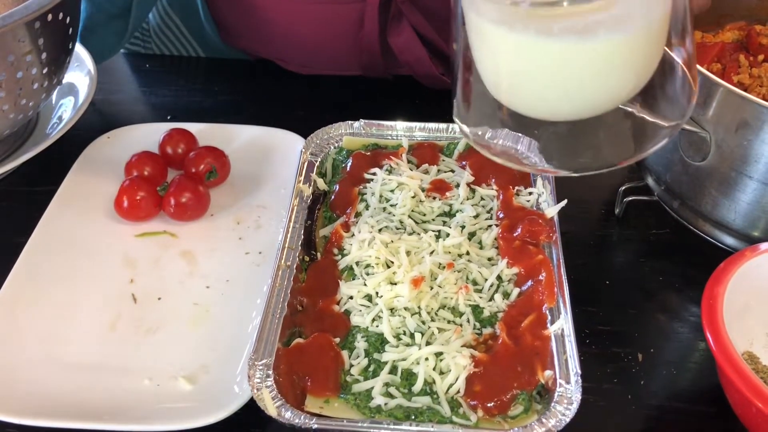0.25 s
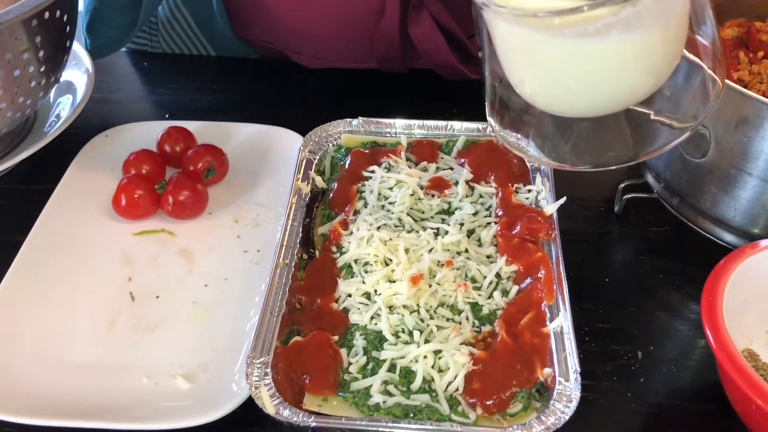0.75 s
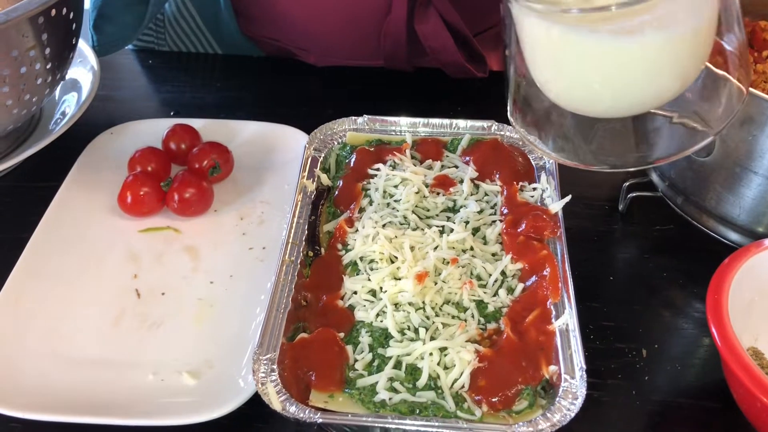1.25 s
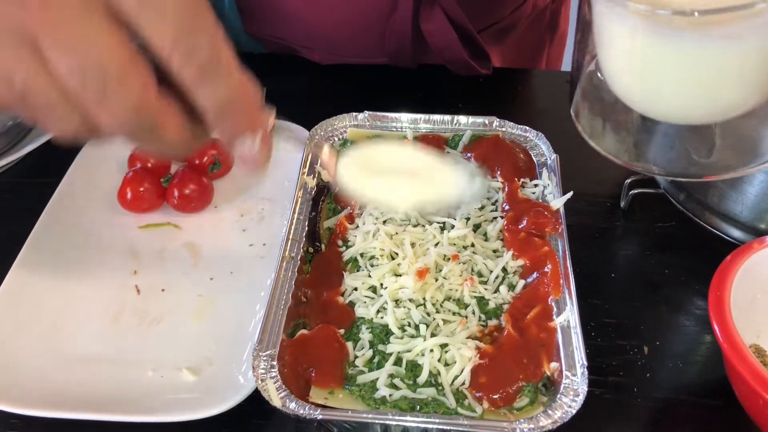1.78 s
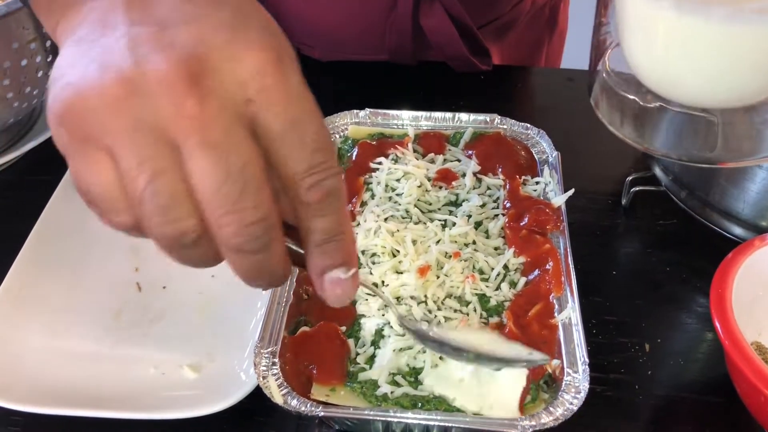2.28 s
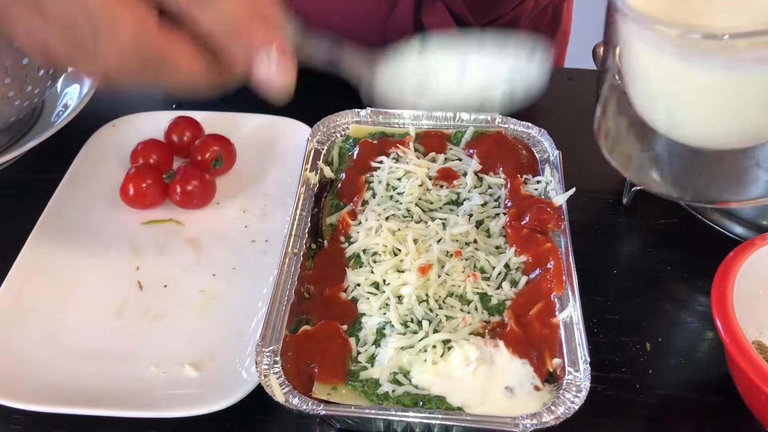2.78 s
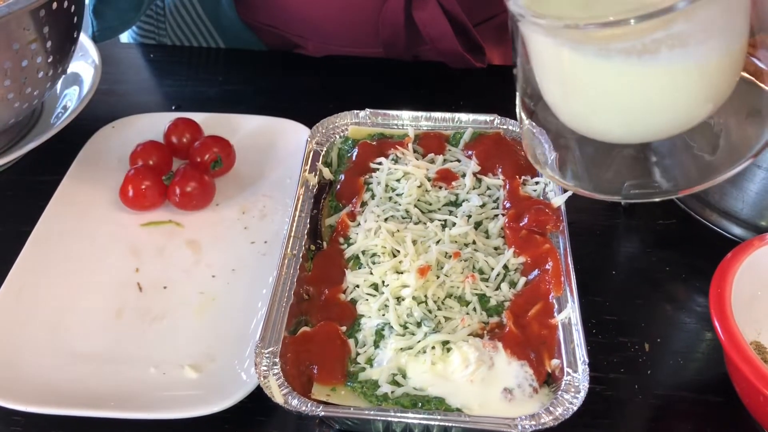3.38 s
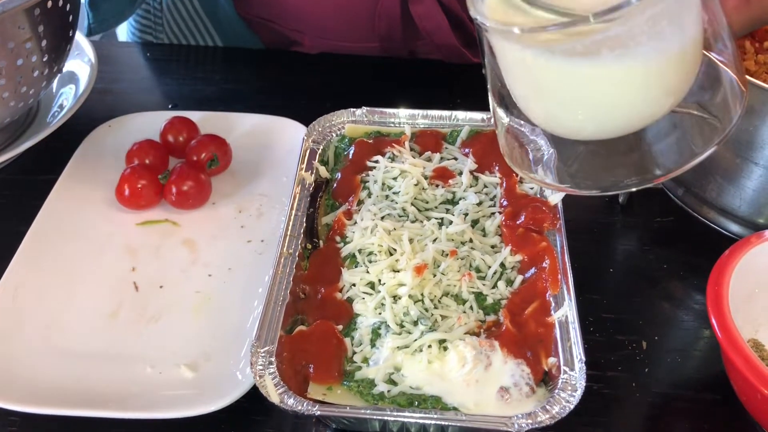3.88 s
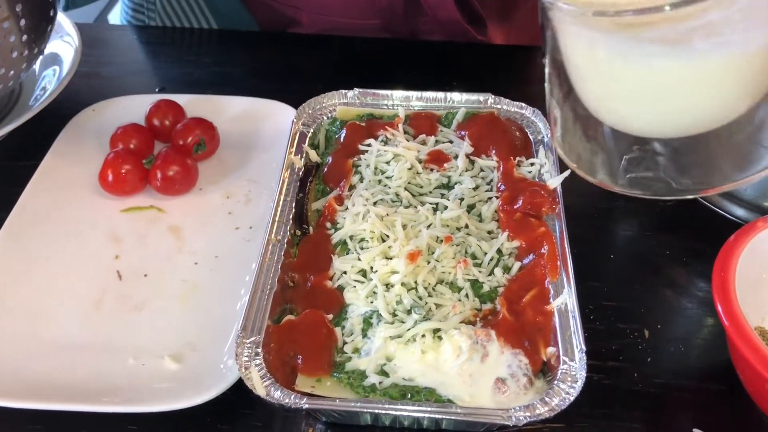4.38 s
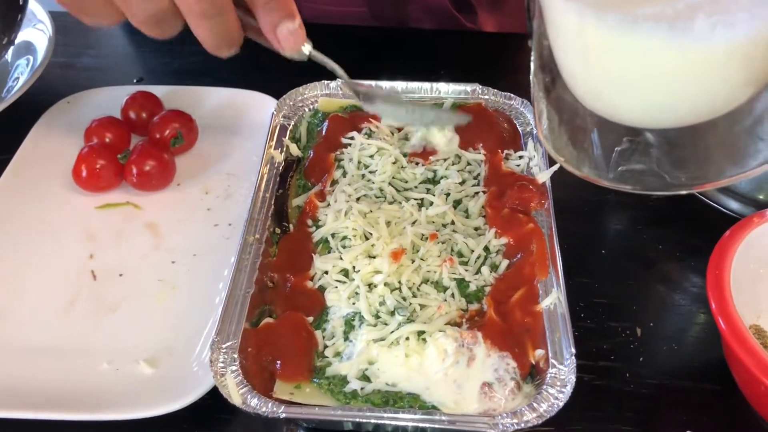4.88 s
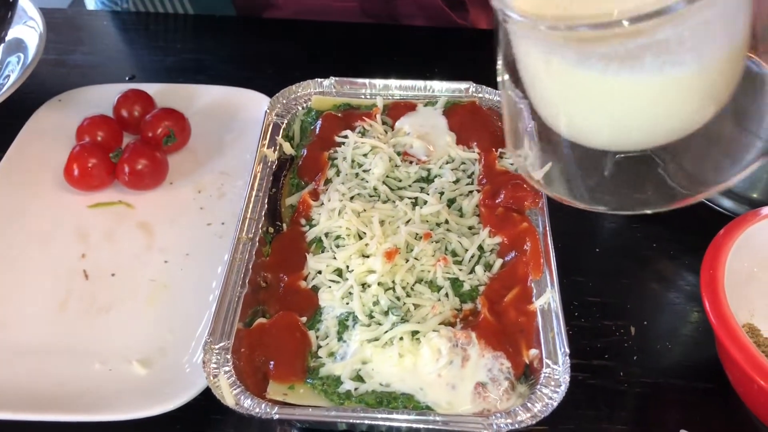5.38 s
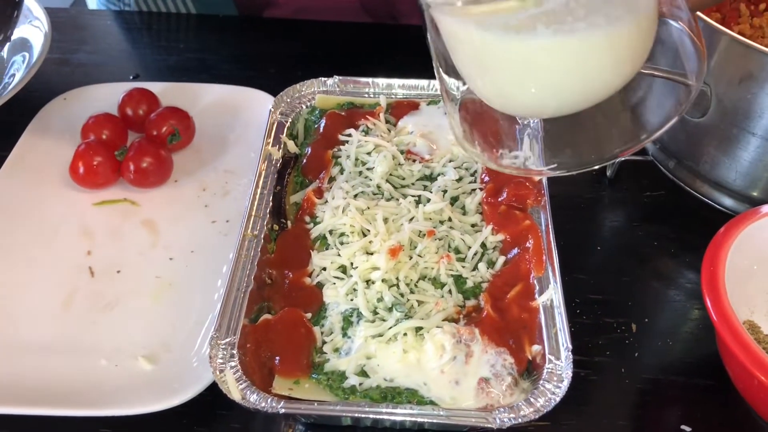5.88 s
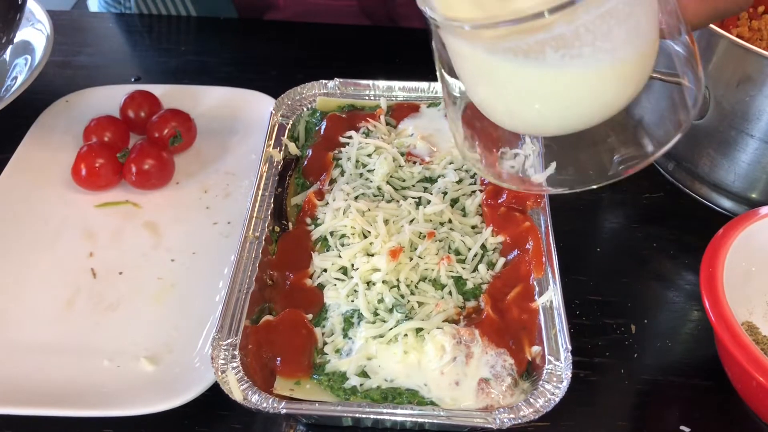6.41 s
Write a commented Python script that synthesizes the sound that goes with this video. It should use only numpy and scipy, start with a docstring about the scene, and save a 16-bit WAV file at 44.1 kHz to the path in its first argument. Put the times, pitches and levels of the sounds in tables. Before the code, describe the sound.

A close double clink of a metal spoon on a glass bowl opens over a low, steady kitchen hum. After faint rustles of spooned sauce and a tiny gliding squeal, the spoon rattles against the glass in a fast run of sharp, ringing knocks, the loudest moment. Another clink, small ticks and more soft spooning lead to one final knock, each strike leaving a short room echo.

```python
"""A steel spoon knocks inside a glass bowl of white sauce, close to the microphone in a quiet kitchen.
Each knock cracks, clanks and sets the glass ringing, and the counter and the room answer it.
Harder knocks are brighter, and the loudest overload the recorder. Between them come small ticks,
soft spooning of sauce onto a foil tray and a faint thin squeal, over a low room hum."""
import sys
import numpy as np
from scipy import signal
from scipy.fft import rfft, irfft, next_fast_len
from scipy.io import wavfile
from scipy.ndimage import map_coordinates

SR = 44100
rng = np.random.default_rng(int(sys.argv[2]) if len(sys.argv) > 2 else 0)


def digitize_waveform(pressure):
    """Quantize a signal to 16-bit integers and store it at the path in sys.argv[1].

    Rows of a 2-D input are taken as channels; values are limited to [-1, 1].
    """
    field = np.atleast_2d(pressure).T
    bounded = np.clip(field, -1, 1)
    quanta = np.round(bounded * 32767).astype(np.int16)
    wavfile.write(sys.argv[1], SR, quanta)


N = 293265

# Knocks of steel on glass. Each row: start in seconds, force in dB, extra weight of the low clank in dB,
# ring level in dB, spot on the bowl, part of the spoon.
KNOCKS = [(0.8986, -18.5, 5, -26, "rim", "back"), (0.9625, -14, 3.5, -19.5, "rim", "back"),
          (3.7016, -11, 2, -12.5, "wall", "back"), (3.7352, -31, 11.5, -24.5, "wall", "back"),
          (3.7988, -13, 0.5, -16, "wall", "back"), (3.838, -17.5, 8.5, -30, "shoulder", "neck"),
          (3.9338, -17, -0.5, -21, "wall", "back"), (3.9679, -21, 2.5, -21, "wall", "edge"),
          (4.022, -42.5, 10, -50, "wall", "back"), (4.41, -19.5, -12, -29.5, "base", "edge"),
          (6.0856, -17, 5, -23.5, "base", "tip")]


def spoon_knocks():
    """Steel strikes glass close by: a sharp crack and a short clank, coloured by force and spoon part."""
    # Short-lived modes of spoon and glass. Each row: pitch in Hz, relative level in dB, t60 in seconds.
    clank_modes = [(1335, -5, .05), (1455, -9, .06), (1507, 3, .08), (1560, -9, .05), (2975, 2, .075),
                   (3130, -10, .035), (3270, -11, .035), (3505, -7, .04), (3564, 0, .05), (3645, -5, .045),
                   (3790, -9, .045), (4020, -16, .07), (4184, -12, .06), (4508, -3, .08), (4600, -10, .12),
                   (5350, -6, .06), (5500, -14, .17), (5768, -6, .07), (6000, -9, .06), (6238, -3, .05),
                   (6670, -3, .05), (7090, -9, .06), (7223, -9, .08), (7550, -14, .08), (8950, -15, .11),
                   (9120, -13, .1), (9480, -12, .08), (9850, -8, .04), (10330, -10, .04), (11190, -9, .04),
                   (11850, -9, .04), (12250, -11, .04)]
    # Spectrum of the contact itself. Each row: frequency in Hz, relative level in dB.
    crack_colour = [(100, -17), (400, -11.5), (700, -19), (950, -7), (1700, 3.5), (2300, -1.5), (3200, 4),
                    (4300, 2.5), (5000, 0), (6000, -2.5), (7400, -4.5), (8350, -7), (9600, 1.5),
                    (12500, -4.5), (16000, -5.5)]
    # Each part of the spoon: gain in dB near 3 kHz, near 3.6 kHz, at 4-6 kHz, in the top treble.
    part_colour = {"back": (8.5, 11.5, -2, -0.5), "neck": (4.4, 3.5, 1.1, 2.5),
                   "edge": (-12.5, 1.5, -1, -4.5), "tip": (-0.5, -11, 3.5, -4)}
    firm_db, brightening = -16.5, 0.17  # harder is a shorter contact: dB of treble per dB above firm
    out, t = np.zeros(N), np.arange(SR) / SR
    hz, mode_db, t60 = np.transpose(clank_modes)
    mode_band = np.searchsorted([2000, 3300, 4100, 6100, 8400], hz)
    attack = 1 - np.exp(-t / 0.00035)
    chatter = amp(-60 * t / 0.017) + amp(-9.5) * amp(-60 * t / 0.036)  # the blow, then steel buzzing
    for start, force_db, weight_db, _, _, part in KNOCKS:
        *middle_db, upper_db, top_db = part_colour[part]
        treble_db = top_db + brightening * (force_db - firm_db)
        band_db = force_db + np.array([weight_db, *middle_db, upper_db, 0, treble_db])
        grip = 1 + .003 * rng.standard_normal(len(hz))  # the grip on the spoon shifts the modes a little
        clank = modes(hz * grip, amp(mode_db + band_db[mode_band]), t60, t)
        add(out, start, in_kitchen(clank * attack, wet_db=-20, counter_db=-25, build_s=0.016))
        hardness = [(1500, weight_db), (5500, upper_db), (11000, treble_db)]
        burst = noise(lambda f: amp(along(crack_colour, f) + along(hardness, f)), size=len(t))
        crack = amp(force_db + 10) * burst * chatter * attack
        add(out, start, in_kitchen(crack, wet_db=-14, counter_db=-18.5, build_s=0.0032))
    return out


def bowl_ring():
    """The glass sings on after each knock until the next firm touch damps it."""
    # The bowl's long-ringing bending modes. Each row: pitch in Hz, t60 in seconds.
    bending_modes = [(1288, .52), (2735, .4), (2992, .41), (3645, .36)]
    # Each spot struck: level of the second, third and fourth mode against the lowest, in dB.
    spot_colour = {"rim": (-32.5, -1.1, -33), "wall": (-11.5, -25.5, -12), "shoulder": (8.6, -16, -8),
                   "base": (-6, -28, -28)}
    # Times in seconds when the spoon or the sauce settles on the wall and stops the ring.
    settle_times = [1.29, 4.17, 4.75, 6.37]
    light_db = -39  # a knock with less force lets the glass ring on
    out, t = np.zeros(N), np.arange(SR) / SR
    hz, t60 = np.transpose(bending_modes)
    firm_times = [start for start, force_db, *_ in KNOCKS if force_db > light_db]
    touches = np.array(firm_times + settle_times + [np.inf])
    attack = 1 - np.exp(-t / 0.0012)
    for start, _, _, ring_db, spot, _ in KNOCKS:
        free_s = touches[touches > start].min() - start
        damping = amp(-60 * np.maximum(t - free_s, 0) / 0.056)
        gains = amp(ring_db + np.array([0, *spot_colour[spot]]))
        add(out, start, modes(hz, gains, t60, t) * damping * attack)
    sway = amp(1.3 * wobble(35))  # the bowl turns in the hand, so its ring swells and sinks
    return in_kitchen(out * sway, wet_db=-18, counter_db=-26, build_s=.02)


def ticks():
    """Light touches of spoon and foil: a few milliseconds of noise around one pitch, with no ring."""
    # Each row: start in seconds, level in dB, centre pitch in Hz.
    touches = [(1.7313, -57, 12650), (3.486, -53, 6800), (4.647, -39.5, 10300), (4.712, -47.5, 12420),
               (4.7214, -48, 4930), (4.809, -50.5, 10800)]
    out, t = np.zeros(N), np.arange(SR // 3) / SR
    for start, db, hz in touches:
        burst = noise(lambda f: 1 / np.hypot(1, 1.8 * (f / hz - hz / (f + 1))), size=len(t))
        tick = amp(db) * burst * amp(-60 * t / .03)
        add(out, start, in_kitchen(tick, wet_db=-13.5, counter_db=-15.5, build_s=.01))
    return out


def hiss_and_sauce():
    """A soft hiss dies away at the start; later come soft, uneven rustles as sauce is spooned."""
    # Each row: peak time in seconds, level in dB, seconds to fade by 20 dB.
    # A negative fade reverses the shape: a slow swell and a quick stop.
    peaks = [(0.06, -57.5, 1.5), (2.56, -61, -0.1), (3.04, -57, 0.9), (3.29, -68.5, -0.05),
             (5.08, -67, 1.3), (5.33, -66, 0.75)]
    # Spectrum of hiss and rustles. Each row: frequency in Hz, relative level in dB.
    colour = [(300, -11.5), (1200, 4), (2500, -1), (5000, -0.5), (6300, -0.5), (7200, 0.5), (8600, -8),
              (10000, 1), (11000, -6), (13000, -5), (15500, -4)]
    swells = [amp(db) * swell(peak_s, 0.37 * fade_s, fade_s) for peak_s, db, fade_s in peaks]
    level = np.hypot(amp(-79), np.linalg.norm(swells, axis=0))  # a faint floor stays between swells
    return level * amp(1.4 * wobble(130)) * noise(lambda f: amp(along(colour, f)), size=N)


def squeal():
    """One faint thin tone dips and climbs; it turns weaker and rougher while it glides fast."""
    # Each row: time in seconds, pitch in Hz.
    pitch_path = [(3.108, 2030), (3.124, 1695), (3.164, 1556), (3.3, 1537), (3.352, 1655), (3.386, 2057),
                  (3.476, 2341), (3.58, 2339)]
    attack_s, release_s = 0.0205, .04
    fast_hz_per_s = 14000  # gliding this fast costs the tone 3 dB
    t = np.arange(N) / SR
    times, pitches = np.transpose(pitch_path)
    hz = np.interp(t, times, pitches)
    start, end = times[0], times[-1]
    sounding = np.interp(t, [start - attack_s, start, end - release_s, end + release_s], [0, 1, 1, 0])
    glide = np.abs(np.gradient(hz)) * SR / fast_hz_per_s
    jitter = .004 * wobble(80) + .012 * np.tanh(glide) * wobble(300)
    tone = np.sin(2 * np.pi * np.cumsum(hz * (1 + jitter)) / SR) / np.hypot(1, glide)
    level = sounding * amp(-59.5 + 1.2 * wobble(61))
    return in_kitchen(level * tone, wet_db=-5.5, counter_db=0, build_s=.008)


def room_tone():
    """Low steady kitchen noise, a little louder at first, with a few humming bands that waver."""
    # Spectrum of the room's air. Each row: frequency in Hz, relative level in dB.
    air_colour = [(12, -71), (20, -35), (48, -9.5), (93, -5.5), (123, -6), (167, 0.5), (203, -6.5),
                  (233, -4), (268, -6.5), (693, -12), (916, -13.5), (1280, -18), (2120, -22.5),
                  (2650, -24.5), (15800, -33)]
    # Each row: centre in Hz, width in Hz, level in dB.
    hum_bands = [(101, 7.4, -67.5), (173, 12, -69.5), (303, 6.6, -68.5), (880, 130, -63.5)]
    air_db = -54 + 6 * np.exp(-np.arange(N) / SR / 0.12)
    air = amp(air_db + 0.34 * wobble(4.6)) * noise(lambda f: amp(along(air_colour, f)), size=N)
    hum = np.zeros(N)
    for hz, width, db in hum_bands:
        band = noise(lambda f: 1 / (1 + (2 * (f - hz) / width) ** 2), size=N)
        waver = amp(1.6 * wobble(5))
        hum += amp(db) * waver * band
    return air + hum


def in_kitchen(x, wet_db, counter_db, build_s):
    """At the microphone: direct sound, early bounces off the counter, a room tail whose highs die first."""
    # Each row: frequency in Hz, the kitchen's t60 in seconds.
    decay_times = [(200, 0.4), (1300, .43), (3000, .47), (6000, .42), (10000, 0.27), (15000, 0.087)]
    hz, frame_s, spectrum = signal.stft(rng.standard_normal(SR * 3 // 4), SR, nperseg=256)
    decay = amp(-60 * frame_s / along(decay_times, hz)[:, None])
    tail = signal.istft(spectrum * decay, SR, nperseg=256)[1]
    t = np.arange(len(tail)) / SR
    tail *= 1 - np.exp(-(t / build_s) ** 2)
    early = rng.standard_normal(len(t)) * t * np.exp(-t / 0.0039)
    answer = amp(wet_db) * tail / np.linalg.norm(tail) + amp(counter_db) * early / np.linalg.norm(early)
    return x + signal.fftconvolve(x, answer)[:len(x)]


def amp(db):
    return 10 ** (np.asarray(db) / 20)


def along(points, hz):
    """The value at hz between (Hz, value) points, on a log frequency axis."""
    freqs, values = np.transpose(points)
    return np.interp(np.log(hz + 1), np.log(freqs + 1), values)


def wobble(rate):
    """A smooth random curve, rate knots a second."""
    return map_coordinates(rng.standard_normal(int(N * rate / SR) + 4), [np.arange(N) * rate / SR])


def swell(peak_s, rise_s, fade_s):
    """A gain that climbs 20 dB in rise_s to its peak, then falls 20 dB every fade_s."""
    t = np.arange(N) / SR - peak_s
    return amp(-20 * np.maximum(-t / rise_s, t / fade_s))


def modes(hz, gains, t60, t):
    """A sum of sines at random phases, each fading 60 dB in its t60."""
    phase = rng.uniform(0, 2 * np.pi, (len(hz), 1))
    return gains @ (np.sin(2 * np.pi * hz[:, None] * t + phase) * amp(-60 * t / t60[:, None]))


def filtered(x, response):
    """x shaped by a gain that is a function of frequency in Hz."""
    size = next_fast_len(len(x) + 8192)
    return irfft(rfft(x, size) * response(np.fft.rfftfreq(size, 1 / SR)), size)[:len(x)]


def noise(response, size):
    """Coloured noise of rms 1."""
    x = filtered(rng.standard_normal(size), response)
    return x / np.sqrt(np.mean(x ** 2) + 1e-20)


def add(track, start, sound):
    """Mix a sound into the track at start seconds."""
    part = track[round(start * SR):][:len(sound)]
    part += sound[:len(part)]


def scene():
    """All that reaches one microphone beside the bowl."""
    return (spoon_knocks() + bowl_ring() + ticks() + hiss_and_sauce() + squeal() + room_tone())[None]


def record(dry):
    """The recorder clips the loudest knocks at full scale; a steep low-pass ends the band."""
    top_hz = 15950
    clipped = np.clip(dry[0], -1, 1)
    return filtered(clipped, lambda hz: 1 / np.sqrt(1 + (hz / top_hz) ** 140))[None]


dry = scene()
out = record(dry)
digitize_waveform(out)
```